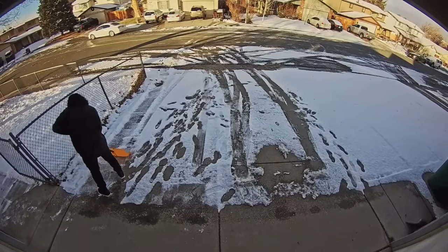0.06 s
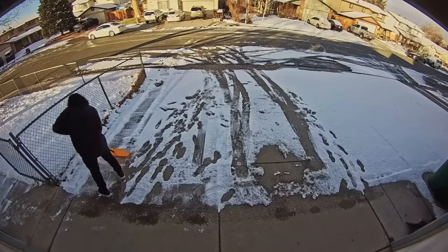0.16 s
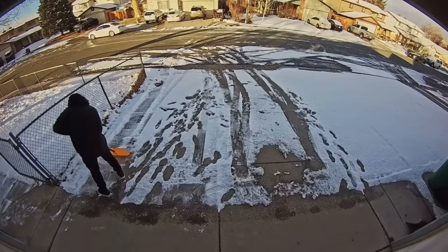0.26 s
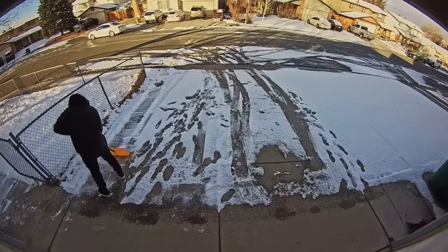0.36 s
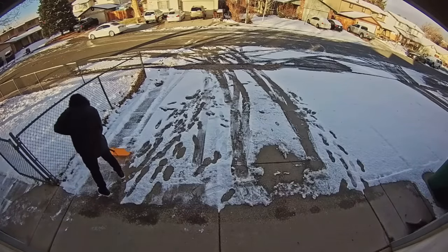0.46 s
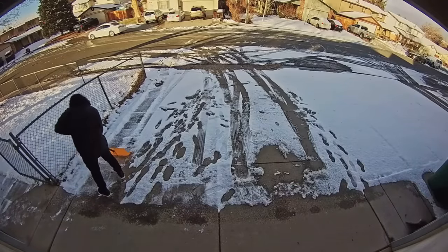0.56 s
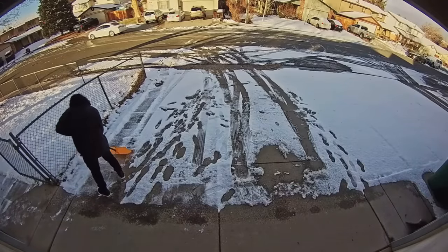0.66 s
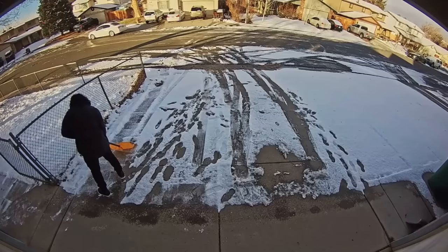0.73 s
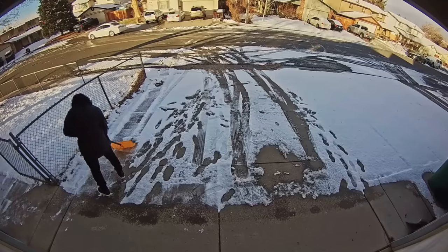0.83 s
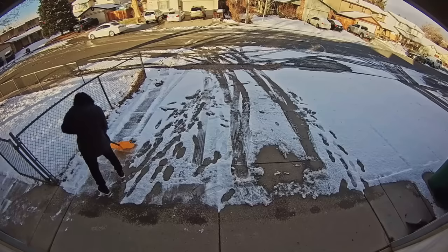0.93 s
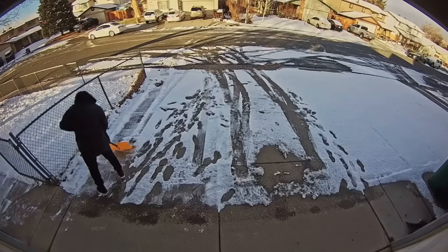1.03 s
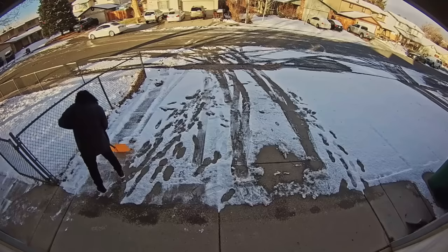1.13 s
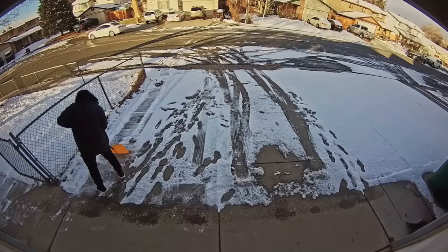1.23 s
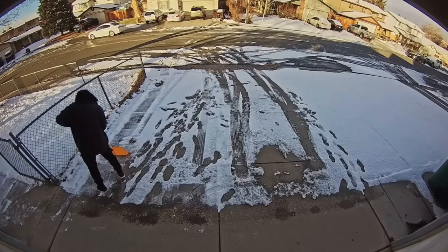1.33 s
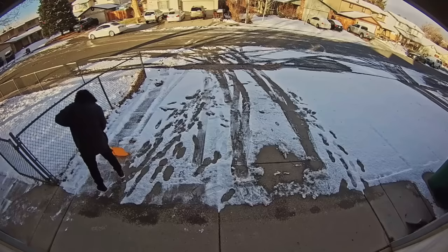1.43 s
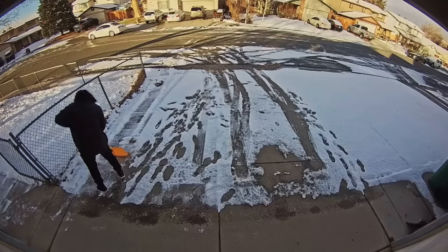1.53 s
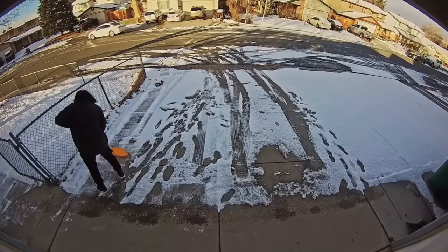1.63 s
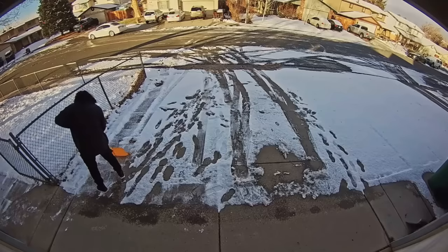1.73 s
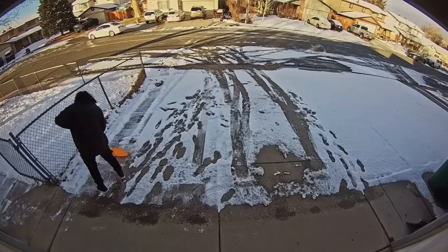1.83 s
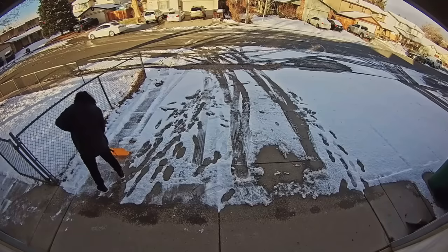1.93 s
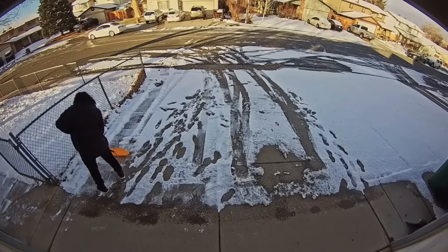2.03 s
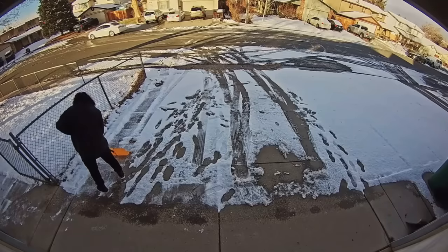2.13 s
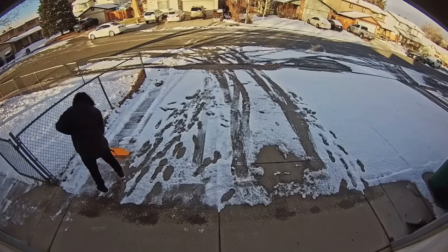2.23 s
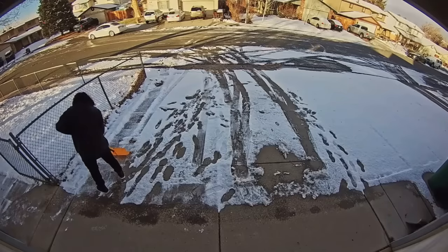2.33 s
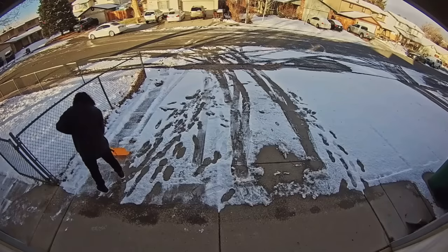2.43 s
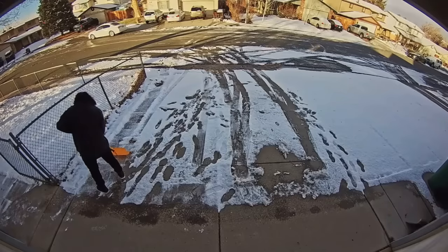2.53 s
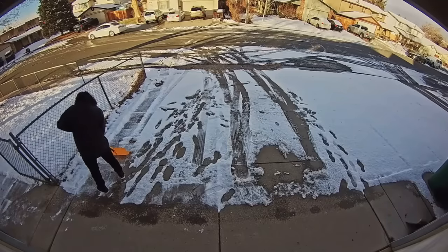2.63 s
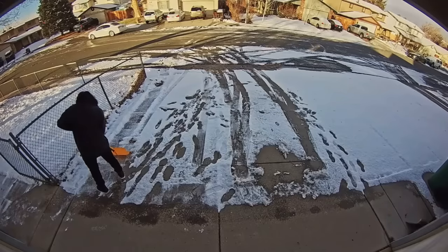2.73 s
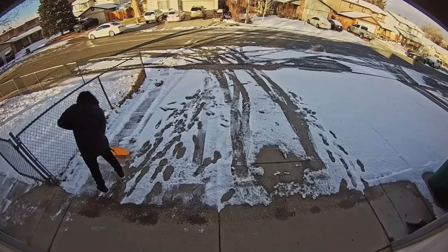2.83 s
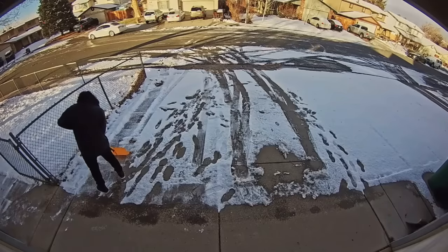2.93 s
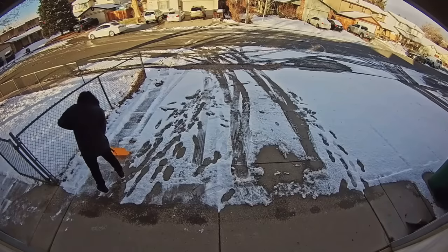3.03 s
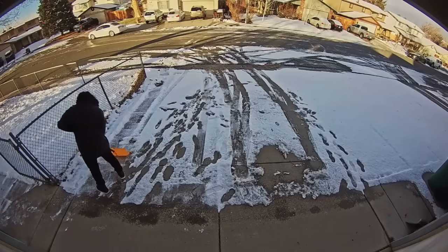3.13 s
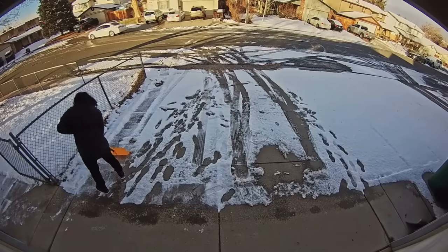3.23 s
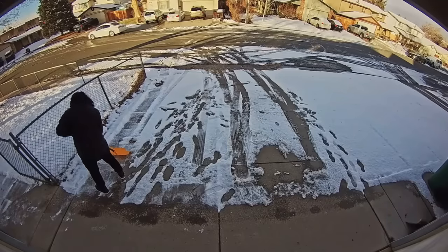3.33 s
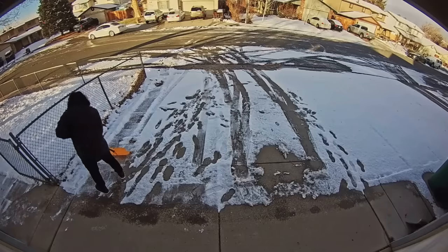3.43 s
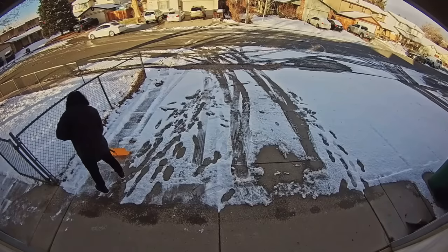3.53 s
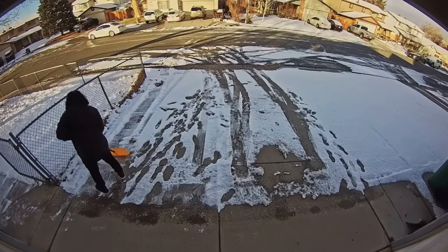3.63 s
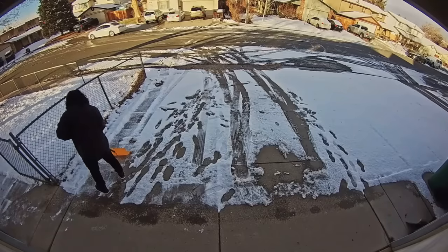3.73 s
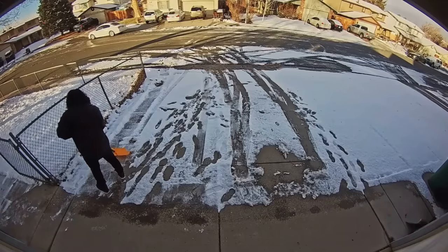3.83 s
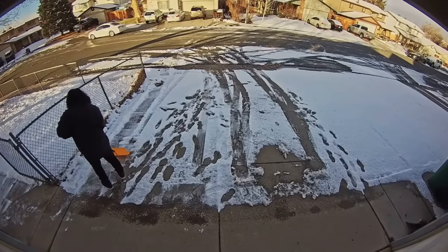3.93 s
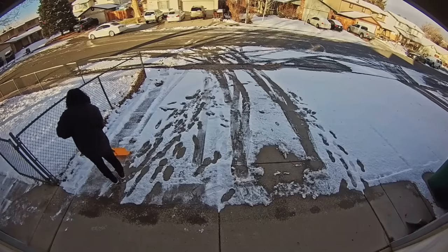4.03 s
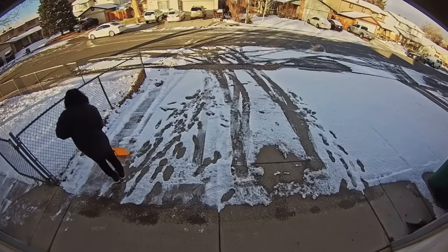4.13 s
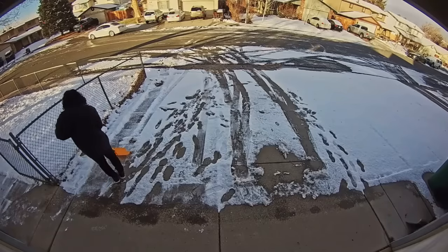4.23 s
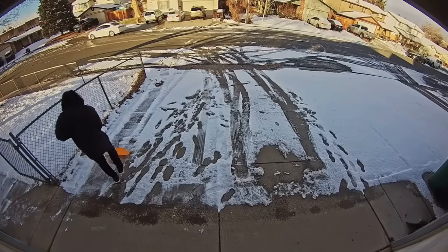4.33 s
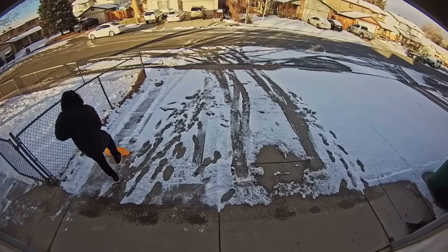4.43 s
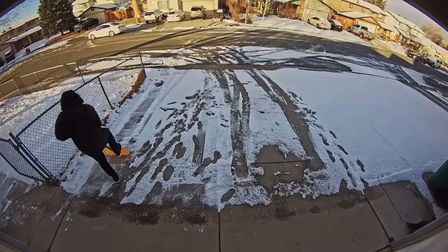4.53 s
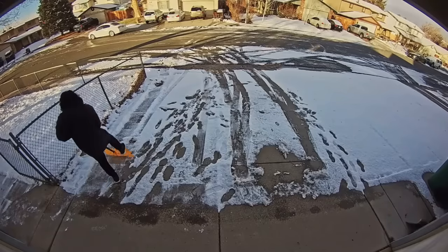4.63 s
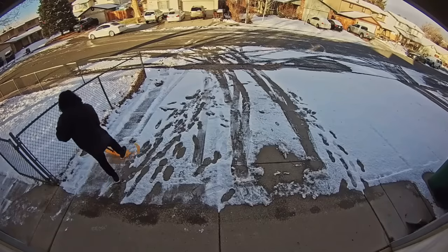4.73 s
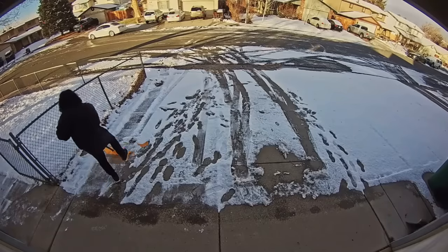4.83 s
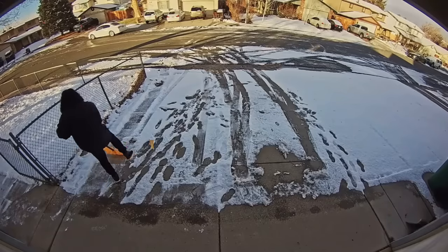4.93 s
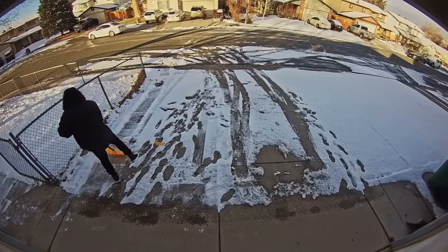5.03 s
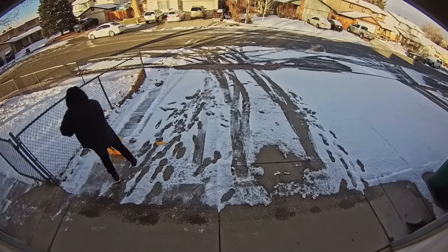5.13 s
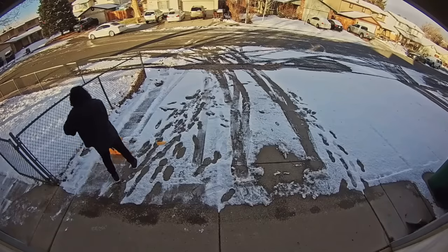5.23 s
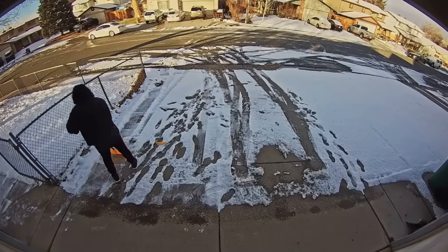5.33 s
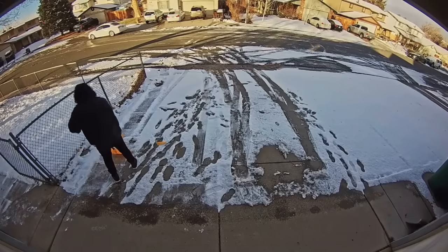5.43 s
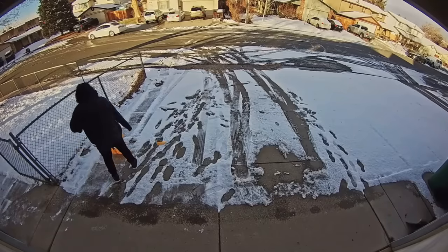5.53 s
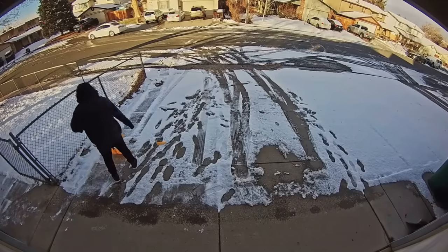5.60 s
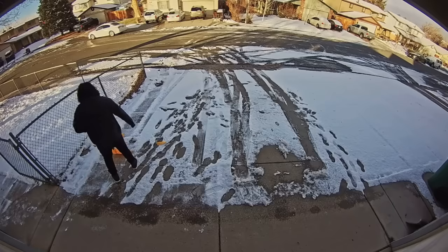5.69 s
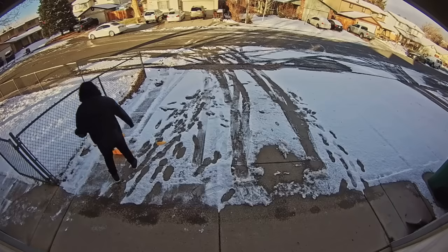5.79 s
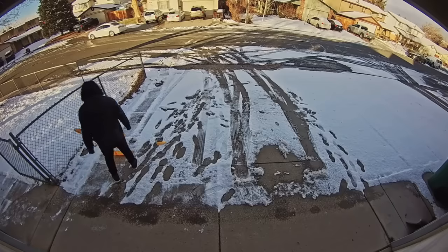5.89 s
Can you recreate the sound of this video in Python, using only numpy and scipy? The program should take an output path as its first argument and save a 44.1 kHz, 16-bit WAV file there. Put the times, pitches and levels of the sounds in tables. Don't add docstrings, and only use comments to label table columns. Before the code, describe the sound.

Outdoors, gritty shovel scrapes and hollow plastic taps give way to a near-quiet gap, a violent distorted crack, and small pieces rattling away.

```python
import sys
import numpy as np
from scipy import signal
from scipy.fft import rfft, irfft
from scipy.io import wavfile
from scipy.ndimage import uniform_filter1d

SR = 44100
rng = np.random.default_rng(int(sys.argv[2]) if len(sys.argv) > 2 else 0)


def volts_from_decibels(level):
    exponent = np.asarray(level, float) / 20
    return 10 ** exponent


def store_wav(level_fs):
    pcm = np.round(np.clip(np.atleast_2d(level_fs), -1, 1) * 32767)
    wavfile.write(sys.argv[1], SR, pcm.T.astype(np.int16))


N = 262836


def evened(x):
    return x / np.sqrt(np.mean(x ** 2) + 1e-20)


def add(mix, start_s, sound):
    part = mix[..., round(start_s * SR):][..., :sound.shape[-1]]
    part += sound[..., :part.shape[-1]]


def shade(points, hz):
    f, db = np.transpose(points)
    return volts_from_decibels(np.interp(np.log(hz + 1), np.log(f + 1), db))


def curve(points):
    return np.interp(np.arange(N) / SR, *np.transpose(points))


def resonate(x, hz, width_hz):
    turn = np.exp(2j * np.pi * np.cumsum(hz * np.ones(len(x))) / SR)
    decay = np.exp(-np.pi * width_hz / SR)
    return 2 * (turn * signal.lfilter([1 - decay], [1, -decay], x / turn)).real


def drift(seconds):
    span = max(round(seconds * SR), 1)
    once = uniform_filter1d(rng.standard_normal(N), span)
    return evened(uniform_filter1d(once, span))


# (start t/s, swell t/s, peak level/dB, fade t/s, grit level/dB re peak)
PUSH_STROKES = [(0, 0.00039, -35.5, 0.076, -2), (.04, 0.047, -41.5, .06, -3),
                (.085, 0.021, -34.5, 0.089, -4.5), (.14, .035, -29, 0.074, -3.5),
                (.2, 0.044, -24.5, 0.053, -2), (.325, 0.018, -44.5, 0.053, -2),
                (.34, 0.053, -50.5, 0.086, -16.5), (.5, 0.082, -30.5, 0.049, -4),
                (.905, 0.099, -20, 0.34, 3), (1.2, 0.028, -40, 0.45, -7.5), (1.39, 0.059, -32, 0.15, -7),
                (1.565, 0.024, -30.5, 0.14, -11), (1.49, 0.025, -35.5, 0.025, -8),
                (1.62, 0.075, -31.5, 0.13, -7.5), (2.145, .03, -41, 0.042, 3),
                (2.183, 0.042, -24, 0.053, 2.5), (2.19, 0.053, -20.5, 0.068, -0.5),
                (2.28, 0.028, -39, 0.11, -6.5), (2.425, 0.004, -56, 0.1, -4),
                (2.47, 0.098, -63.5, 0.075, -10), (3.225, 0.0052, -34, 0.06, -7),
                (3.25, 0.067, -32.5, 0.045, -13), (3.352, 0.031, -28.5, 0.053, -11.5),
                (3.6, 0.073, -68, .5, -20.5), (4.3, .07, -60, 0.14, -25)]
SKID_STROKES = [(.47, 0.018, -52, 0.024, 5), (.629, 0.00097, -35.5, 0.013, 13), (.72, 0.16, -55, 0.063, -2),
                (.84, 0.039, -52.5, 0.017, -1), (.876, 0.0079, -27, 0.19, -7),
                (1.166, 0.0085, -31.5, 0.04, -6), (1.33, 0.022, -25, 0.067, -2.5),
                (3.205, .021, -50, 0.011, -6), (3.475, 0.011, -59.5, 0.092, 2),
                (3.56, 0.023, -68, 0.073, -12), (3.64, 0.069, -75, 0.2, -15),
                (4.365, 0.035, -46, .011, 12.5), (4.393, 0.0011, -25, 0.0057, 10.5),
                (4.4, 0.018, -44, 0.27, -6), (4.585, 0.016, -51.5, 0.031, -6.5),
                (5.17, 0.11, -44.5, 0.14, 12.5), (5.321, 0.004, -29, 0.11, 3.7),
                (5.373, 0.089, -36, 0.066, 7), (5.43, 0.089, -37.5, 0.19, 0.5),
                (5.625, 0.049, -51.5, 0.04, -1), (5.8, 0.025, -59.5, 0.031, 5),
                (5.84, 0.005, -35, 0.021, -9.5), (5.855, 0.0047, -54, 0.07, -3),
                (5.94, 0.019, -40.5, 0.015, 1)]
TEAR_STROKES = [
    (4.86, 0.032, -51, .021, 0.5),
    (4.882, .021, -34, 0.015, 3.5),
    (4.904, .002, -13, 0.033, -1),
    (4.912, 0.0036, -0.5, 0.15, 5),
    (4.93, 0.039, -0.5, 0.045, 4),
    (5.0, 0.0073, -14, 0.037, -7.5),
    (5.026, 0.0078, -12, .04, 3.5),
    (5.06, 0.0018, -6.5, 0.07, 6),
    (5.108, 0.0034, -16, .07, -8),
    (5.08, .04, -26.5, 0.21, 5),
]


def scrapes():
    grains = rng.standard_normal((3, N)) * volts_from_decibels(2.0 * np.minimum(rng.exponential(1, N), 4))
    grains = evened(grains * volts_from_decibels(2.5 * drift(.003)))
    power = np.zeros((3, N))
    for strokes, belly_db in ((PUSH_STROKES, -1.5), (SKID_STROKES, -16), (TEAR_STROKES, -9)):
        for start, swell, db, fade, grit_db in strokes:
            t = np.arange(0, swell + 2 * fade, 1 / SR)
            rising_db = -16.5 * (1 - t / swell)
            falling_db = -33.5 * (abs(t - swell) / fade) ** 1.047
            under_db = np.where(t < swell, rising_db, falling_db)
            ranges_db = np.array([belly_db + 0.8 * under_db, under_db, grit_db + 1.19 * under_db])
            push = volts_from_decibels(ranges_db + db) * np.minimum(t * SR / 60, 1)
            add(power, max(start, 0), push ** 2)
    return grains * np.sqrt(power)


# (t/s, peak level/dB, ring f/Hz, grit level/dB re peak)
THUMP_HITS = [(0.504, -20.5, 2090, 6), (1.287, -23.5, 1970, -22), (1.401, -16, 2070, -2),
              (2.152, -43, 1114, 1.5), (3.089, -52.5, 1624, -15), (3.227, -27, 626, 1.5),
              (3.279, -23.5, 990, 0), (3.297, -16.5, 627, -14), (3.311, -22.5, 650, -4),
              (3.326, -22, 1002, -4), (3.36, -19, 1010, -5), (3.382, -14.5, 1030, -3.5),
              (3.689, -40, 627, -22.5), (4.34, -42, 4620, -8), (4.913, -2.5, 1306, -3.5),
              (5.061, -5, 5240, 4.5)]
TAP_HITS = [(0.087, -26.5, 1420, 2), (0.105, -27.5, 3590, 7), (0.207, -15, 1720, 8.5),
            (0.629, -6.5, 2004, 0), (0.749, -43.5, 2000, 1), (0.775, -32.5, 5470, -5),
            (0.795, -45, 2000, -4), (0.815, -51, 1400, 6), (0.833, -36, 1104, 7), (0.879, -13.5, 1350, 10),
            (0.973, -17.5, 2650, 13), (1.167, -15.5, 1390, 1), (1.184, -20, 1960, -14),
            (1.345, -14, 1060, 6), (1.436, -21, 4250, 9), (1.447, -20, 1080, -1), (1.472, -20, 1650, 0.5),
            (1.49, -21.5, 1650, 1), (1.595, -17, 490, -14), (1.655, -21, 2020, 4), (1.989, -40, 1626, 8),
            (2.181, -10.5, 2040, 14), (2.333, -24, 1355, -34), (2.435, -36, 996, -12.5),
            (2.626, -41.5, 986, 8), (3.248, -15.5, 590, -3.5), (3.493, -42.5, 1046, -16),
            (3.574, -42, 1360, -17), (3.599, -41, 1350, -1.5), (4.373, -42, 5250, 17.5),
            (4.393, -14.5, 2113, 2), (4.44, -25, 1366, 2), (4.484, -29, 990, -3.5),
            (4.552, -35, 1130, -5.5), (4.585, -37, 1496, -7)]
CLATTER_HITS = [(4.904, -1, 1075, -6), (5.027, 0, 1050, 4.5), (5.109, -6, 644, -8), (5.222, -18, 2630, 0.5),
                (5.242, -23, 4740, 13), (5.29, -24.5, 3030, 6), (5.323, -13.5, 1920, 4),
                (5.362, -30, 4630, 21), (5.394, -23, 2820, 11), (5.424, -26, 6240, 7),
                (5.451, -21.5, 1370, 9), (5.498, -20, 1016, -4), (5.605, -41.5, 2593, 3.5),
                (5.646, -36.5, 5360, -6), (5.688, -43.5, 4450, -1), (5.732, -48, 1067, 4.5),
                (5.847, -29, 690, -5), (5.875, -35, 2070, -8), (5.948, -29.5, 2006, -19)]


def knocks():
    t = np.arange(6000) / SR
    drive, ring = np.zeros((3, N)), np.zeros(N)
    for hits, belly_db, t60 in ((THUMP_HITS, -1, 0.028), (TAP_HITS, -26.5, 0.031), (CLATTER_HITS, -30.5, .048)):
        crack = volts_from_decibels(-60 * t / np.clip(t60, .01, .1))
        quick_crack = 1.1 * volts_from_decibels(-60 * t / .025)
        shape = (crack + quick_crack) * np.minimum(t / .003, 1)
        for start, db, hz, grit_db in hits:
            blow = rng.standard_normal((3, len(t))) * volts_from_decibels(db - 15) * shape
            add(drive, start - .002, blow * volts_from_decibels(np.array([[belly_db], [0], [grit_db]])))
            struck = resonate(blow[1], hz, 50 + .015 * hz)
            add(ring, start - .002, struck * volts_from_decibels(db - 9.5) / abs(struck).max())
    return drive, ring


# (f/Hz, level/dB per Hz)
BODY_COLOUR = [(18, -51), (30, -37.5), (227, -3.5), (413, 6.5), (654, 6), (786, 0), (1080, -6.5),
               (1840, -4), (6080, -11), (7310, -19), (9500, -36), (16100, -120)]


def body_responses():
    hz = abs(np.fft.fftfreq(8192, 1 / SR))
    belly = 1 / (1 + (hz / 850) ** 6)
    grit = 1 - 1 / (1 + (hz / 2800) ** 6)
    gains = shade(BODY_COLOUR, hz) * [belly, 1 - belly - grit, grit]
    log_gain = np.log(np.maximum(gains, 1e-5))
    taps = np.fft.ifft(np.exp(np.conj(signal.hilbert(log_gain)))).real[:, :4096]
    return taps / np.linalg.norm(taps, axis=1, keepdims=True)


# (f/Hz, level/dB over the broad noise)
BLADE_MODES = [(500, -3), (624, 1), (824, -2), (1060, 13.5), (1375, 8.5), (1680, -0.8), (1830, -10),
               (2070, 5), (2480, 2), (2860, 8), (3620, 0.5), (4650, 3), (5550, -6), (6200, -6)]
# (from t/s, freedom to ring level/dB, belly f/Hz, loosest mode f/Hz, its level/dB)
GRIPS = [(0, 3, 332, 1380, 9), (0.069, 4.5, 366, 3610, 18), (0.111, 3, 366, 2850, 16),
         (0.154, -1, 344, 1015, 14), (0.222, -0.5, 525, 1065, 11), (0.459, 2, 351, 2080, 25.5),
         (0.531, 2, 366, 6220, 18.5), (0.571, 7, 373, 1080, 24), (0.873, -3.5, 360, 2140, 4),
         (0.96, -6, 308, 2730, 9), (1.01, -5, 313, 743, 9.5), (1.09, 3, 329, 1030, 8),
         (1.21, 2.5, 308, 2745, 12), (1.332, -8, 314, 1059, 13.5), (1.389, 4, 340, 2600, 6),
         (1.43, 5.5, 332, 1670, 15), (1.464, 2.5, 323, 1086, 11), (1.561, 0, 499, 4610, 19.5),
         (1.609, 1.5, 330, 1337, 18.5), (1.67, 2, 608, 1364, 14), (1.704, -2.5, 481, 1370, 10),
         (1.902, 6.5, 277, 1047, 20), (2.174, -6, 269, 759, 4.5), (2.29, -3, 332, 1001, 13.5),
         (3.001, 0, 370, 2465, 19.5), (3.46, -7, 510, 1025, 23), (3.56, 34, 370, 1380, 24.5)]
# (from t/s, [(f/Hz, level/dB over the broad noise)])
EDGE_SLAPS = [
    (0.325, [(620, 4), (1080, 23), (1400, 7), (2070, 7.5)]),
    (0.622, [(1300, 0), (1950, 16.5), (3900, 8), (4900, 1), (6200, -1), (6900, 10)]),
    (0.72, [(1100, 8.5), (1400, 5), (2050, 9.5), (4300, 5), (5470, 7.5), (6400, 5)]),
    (3.2, [(630, 9), (1000, 6.5), (1400, 1), (1830, 6.5), (2480, 10), (2870, 1), (3620, 10.5), (4650, 10)]),
    (3.245, [(370, 18.5), (630, 11), (1830, 5), (2480, 6), (3450, 11), (4590, 6)]),
    (3.277, [(630, 16), (820, 13), (990, 21), (1350, 9), (2060, 8), (2480, 5), (3550, 9), (4650, 12)]),
    (3.349, [(510, 10), (624, 15.5), (1020, 23), (1680, 3), (2110, -4), (2470, -3), (3410, 15), (4600, 10)]),
]
# (from t/s, [(f/Hz, level/dB over the broad noise)])
PIECE_MODES = [(4.25, [(400, 7), (980, -5.5), (1420, 5.5), (2120, 5), (3600, 6.5), (3850, 9), (5150, 6),
               (6400, -12)]), (4.47, [(970, 10), (1420, 6), (2000, 2.5), (2400, 4), (3700, 6.5),
               (5150, 3.5)]), (4.58, [(1000, 2), (1400, 5), (1550, 9), (1720, 4.5)]), (4.8, [(85, 6.5),
               (140, 7.5), (980, -2), (1380, -1), (2040, 10), (4040, -3.5), (6190, -4)]), (4.942, [(85, 8),
               (140, 2), (385, 5), (507, 1.5), (1690, -5.5), (2980, -4.5), (4400, -6), (6190, -3.5)]),
               (5.02, [(375, 6), (630, 5), (1040, 10), (1400, -5), (5340, -4), (6360, -2)]),
               (5.056, [(405, 4.5), (510, 1), (1440, -2), (2160, 0), (4940, 0)]), (5.103, [(260, 7),
               (405, 5), (650, 3.5), (1450, -14), (4420, -4)]), (5.135, [(300, 6), (440, 6.5), (1100, -1.5),
               (1690, -2.5), (2640, 1.5)]), (5.202, [(420, -9), (1060, -1), (2610, 1), (3030, -1),
               (4600, -7)]), (5.312, [(700, 4), (1067, 9.5), (1830, 6), (4100, -4)]), (5.355, [(1830, 14.5),
               (3320, 9), (4380, 8.5), (5925, 6)]), (5.421, [(700, 1.5), (1060, 12.5), (1360, 5),
               (2070, 4.5), (3200, -4)]), (5.555, [(1060, 15.5), (2070, 4), (3375, 11), (4540, -4.5),
               (5380, 0)]), (5.79, [(685, 22.5), (1100, 10.5), (1420, 11.5), (2072, 21.5), (4430, 8.5),
               (6450, 9)])]


def blade(x):
    out, wander = np.zeros(N), drift(0.022)
    poses = EDGE_SLAPS + PIECE_MODES
    for start, free_db, belly_hz, loose_hz, loose_db in GRIPS:
        whole = [(hz, db + free_db) for hz, db in BLADE_MODES]
        poses = poses + [(start, [(belly_hz, 12.5), (loose_hz, loose_db)] + whole)]
    poses = sorted(poses, key=lambda pose: pose[0])
    starts = [round(max(start, 0) * SR) for start, _ in poses] + [N]
    for a, b, (_, modes) in zip(starts, starts[1:], poses):
        part = np.append(x[a:b], np.zeros(3000))
        rung = volts_from_decibels(-5) * part
        for hz, db in modes:
            swell, bend = (np.roll(wander, rng.integers(N))[:len(part)] for _ in range(2))
            mode = resonate(volts_from_decibels(3 * swell) * part, hz * (1 + .007 * bend), 24 + .014 * hz)
            rung += volts_from_decibels(db) * mode
        add(out, a / SR, rung * np.linalg.norm(part) / np.linalg.norm(rung))
    return out


# (t/s, level/dB, f/Hz, t60 t/s)
GROUND_THUDS = [
    (1.0, -40, 120.7, .2),
    (2.237, -30.5, 128.3, .12),
    (4.911, -17.5, 124.2, .12),
    (4.928, -27, 172, 0.17),
]


def thuds():
    t, out = np.arange(12000) / SR, np.zeros(N)
    for start, db, hz, t60 in GROUND_THUDS:
        rise = np.minimum(t / 0.0089, 1)
        add(out, start, volts_from_decibels(db - 60 * t / t60) * np.sin(2 * np.pi * hz * t) * rise)
    return out


def yard(x):
    t = np.arange(.004, .25, .0005)
    tail = np.zeros(round(.26 * SR))
    at = (t * SR).astype(int) + rng.integers(0, 20, len(t))
    tail[at] = rng.choice([-1., 1.], len(t)) * volts_from_decibels(-60 * t / .12)
    return signal.oaconvolve(x, tail / np.linalg.norm(tail))[:N]


# (t/s, f/Hz, level/dB)
ENGINE_REVS = [(0.0, 91, -59.5), (0.458, 93.2, -65), (0.606, 93.4, -59), (0.756, 94.7, -79),
               (0.9, 95.8, -60.5), (1.3, 94.2, -66), (1.45, 103.8, -77), (1.848, 110.5, -71.5),
               (2.14, 118, -50.5), (2.4, 126.5, -65.5), (2.55, 131.4, -55.5), (3.25, 137.2, -48.5),
               (3.99, 141.4, -56), (4.41, 136.3, -55), (4.661, 129.6, -77), (5.3, 125.3, -80),
               (5.6, 104, -70.5), (5.96, 106.2, -79)]
# (multiple of the firing rate, level/dB)
ENGINE_ORDERS = [
    (1, 1),
    (1.5, -28),
    (2.5, -20),
]


def engine():
    s, hz, db = np.transpose(ENGINE_REVS)
    t = np.arange(N) / SR
    turns = np.cumsum(np.interp(t, s, hz) * (1 + .005 * drift(.03))) / SR
    tones = sum(volts_from_decibels(order_db) * np.sin(2 * np.pi * k * turns) for k, order_db in ENGINE_ORDERS)
    return np.sqrt(2) * volts_from_decibels(np.interp(t, s, db) + 1.8 * drift(.03)) * tones


# (t/s, level/dB)
SUPPRESSOR = [
    (0, 6),
    (.7, 0),
    (2.6, 0.5),
    (4.3, -1),
    (4.65, -5.5),
    (4.9, -8),
    (5.7, -4.5),
    (5.96, -11),
]
# (f/Hz, level/dB per Hz)
RUMBLE_COLOUR = [(15, -68.5), (25, -41.5), (86, -9.5), (114, -1.5), (139, -10.5), (162, -10.5),
                 (188, -18.5), (303, -40), (500, -42), (650, -55), (1100, -120)]
# (f/Hz, level/dB per Hz)
HISS_COLOUR = [(120, -33), (200, -1.5), (438, -9.5), (657, -13.5), (1570, -19.5), (5570, -22.5),
               (7310, -24.5), (9500, -60.5), (16100, -120)]


def coloured_noise(colour):
    gain = shade(colour, np.fft.rfftfreq(N, 1 / SR))
    return evened(irfft(rfft(rng.standard_normal(N)) * gain, N))


def street():
    open_db = curve(SUPPRESSOR)
    rumble = coloured_noise(RUMBLE_COLOUR) * volts_from_decibels(-65 + 0.94 * open_db + 0.64 * drift(.05))
    hiss = coloured_noise(HISS_COLOUR) * volts_from_decibels(-66 + open_db + 0.47 * drift(0.032))
    return rumble + hiss


# (t/s, level/dB)
ECHO_GATE = [
    (4.62, 0),
    (4.645, -25),
    (4.8, -25),
    (4.84, 0),
]


def scene():
    rub = scrapes()
    blows, ring = knocks()
    broad = signal.oaconvolve(rub + blows, body_responses(), axes=1)[:, :N].sum(0)
    shovel = blade(broad) + ring + thuds()
    heard = (shovel + volts_from_decibels(-10.0) * yard(shovel)) * volts_from_decibels(curve(ECHO_GATE))
    return (heard + engine() + street())[None]


def roll_off(x):
    return signal.sosfilt(signal.butter(12, 15830, fs=SR, output="sos"), x)


def record(dry):
    top, knee = .87, 3
    full = top * np.tanh((abs(dry) / top) ** knee) ** (1 / knee) * np.sign(dry)
    voice_band = signal.firwin(161, 7070, window=("kaiser", 8.), fs=SR)[None]
    band = signal.oaconvolve(full, voice_band, "same")
    flattened = np.clip(band, -.97, .97)
    top_cut = signal.firwin(201, 15900, window=("kaiser", 9), fs=SR)[None]
    spill = signal.oaconvolve(flattened, top_cut, "same")
    return roll_off(spill)


dry = scene()
out = record(dry)
store_wav(out)
```